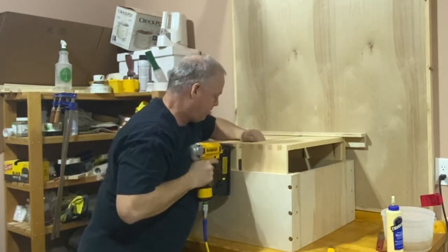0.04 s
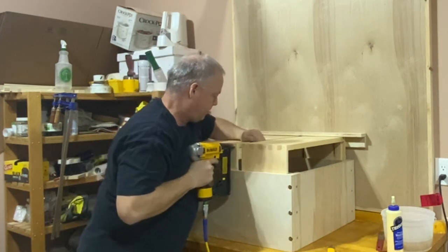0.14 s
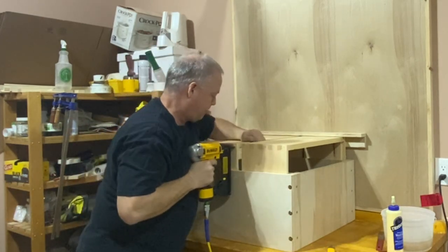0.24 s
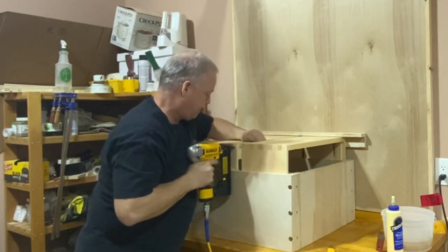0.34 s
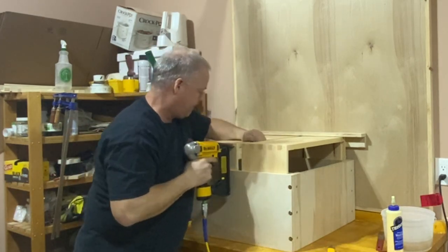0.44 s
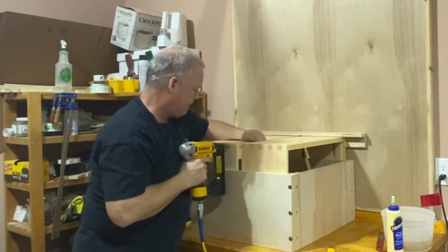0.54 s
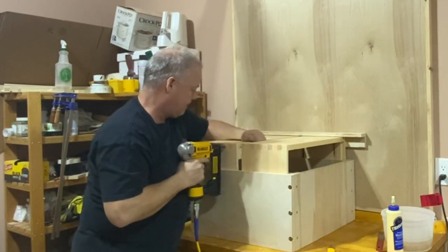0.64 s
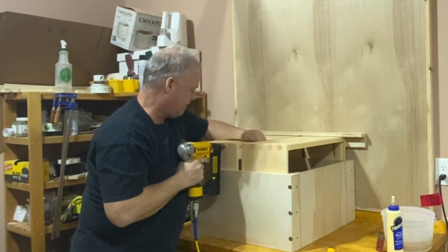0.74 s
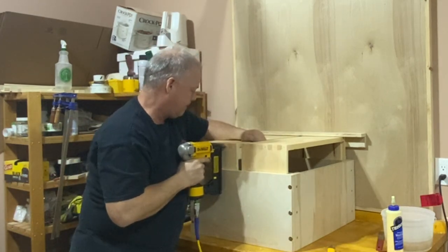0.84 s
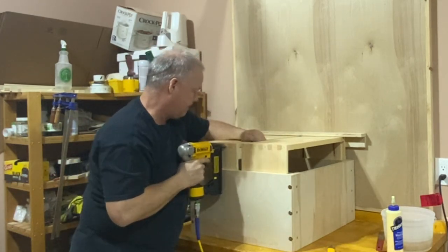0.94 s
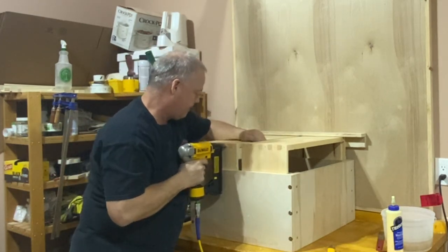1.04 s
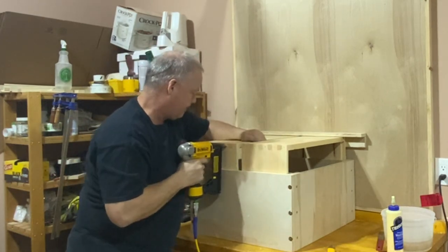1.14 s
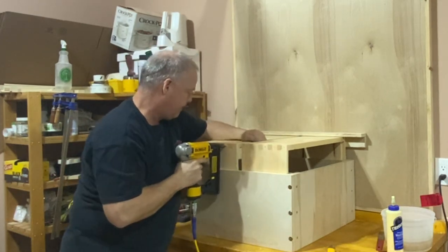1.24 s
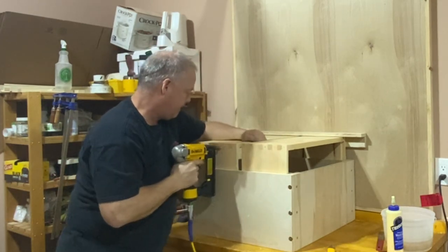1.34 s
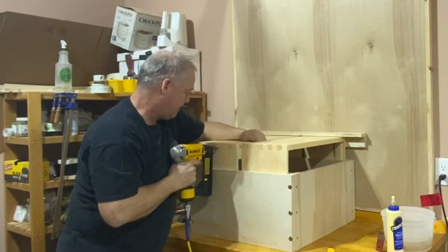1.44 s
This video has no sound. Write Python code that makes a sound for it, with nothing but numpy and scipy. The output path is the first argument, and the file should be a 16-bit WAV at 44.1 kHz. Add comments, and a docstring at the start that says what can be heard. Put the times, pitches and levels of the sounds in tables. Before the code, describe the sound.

An air stapler fires twice into a hollow plywood box. After a faint thud at the start, a sharp crack and woody rattle hit at 0.21 s, with a metallic return clack and air puff at 0.31. Hiss fades; faint nose clicks and scuffing come at 0.72-0.86, soft bumps near 0.95. The second shot hits at 1.04, its return at 1.14, then a drag on wood at 1.38-1.5. Short room tail, low steady hum.

```python
"""A faint thud, then an air stapler fires twice into a plywood box in a small workshop. Each shot: valve crack
(shaped noise), rattling driver blow into the box (noise, grains and ringing modes), leaking air, the piston's
ringing return with an exhaust puff, knocks (ringing sines). Between the shots the nose clicks, bumps and drags on
the wood; after the second it drags again. Room tails and steady background noise surround it.
One microphone is widened to stereo by a phase-turning filter and a share that differs between the channels."""
import sys
import numpy as np
from scipy import signal
from scipy.fft import rfft, irfft, next_fast_len
from scipy.io import wavfile

SR = 44100
rng = np.random.default_rng(int(sys.argv[2]) if len(sys.argv) > 2 else 0)


def ratio_of_db(decibels):
    """Turn decibels (scalar or array-like) into linear amplitude factors; 0 dB maps to 1."""
    return 10 ** (np.asarray(decibels, float) / 20)


def transcribe(u):
    """Save the signal u as a 16-bit wav file named by the first command-line argument.

    u: samples, shape (n,) or (channels, n), limited to [-1, 1]; the rate is SR.
    q: integer samples, one column per channel.
    """
    v = np.clip(np.atleast_2d(u).T, -1, 1)
    q = np.round(v * 32767).astype(np.int16)
    wavfile.write(sys.argv[1], SR, q)


N = 66150
T = np.arange(N) / SR
M = next_fast_len(2 * N)
HZ = np.maximum(np.arange(M // 2 + 1) * SR / M, 1)

# shots: start_s, crack_db, blow_db, blow_delay_s
SHOTS = [(0.2095, -14.5, -11.5, 0.005), (1.038, -12.5, -14, 0.00664)]
# piston returns, one for each shot: start_s, ring_db, exhaust_db, leak_db
RETURNS = [(0.3141, -1, -19, -26), (1.1384, -0.5, -17, -19.5)]
# spectral density of escaping air: frequency_hz, level_db
AIR_SPECTRUM = [(200, -7.5), (500, -3.5), (1000, -8.5), (1600, 1), (2250, 2.5), (2550, -2), (4500, -11),
                (6000, -4), (10000, -3.5), (12000, -4), (15600, -14), (16300, -40)]
AIR_RELEASE_T60_S = 0.19


def at_hz(points, hz=HZ):
    """Spectral interpolation: a level curve is linear over log frequency."""
    freq_hz, level = np.array(points)[:, 0], np.array(points)[:, 1]
    return np.interp(np.log(hz), np.log(freq_hz), level)


def colour(x, spectrum):
    """Minimum-phase filtering by a folded cepstrum: causal, with unit power gain on white noise."""
    cepstrum = irfft(np.log(ratio_of_db(at_hz(spectrum))), M)
    cepstrum[1:M // 2] *= 2
    response = np.exp(rfft(cepstrum[:M // 2 + 1], M))
    power_gain = np.mean(abs(response) ** 2)
    return irfft(rfft(x, M) * response / np.sqrt(power_gain), M)[:N]


def shape(start, rise, hold, t60):
    """Energy decay: linear rise, hold, then exponential release of 60 dB in t60 (all in s)."""
    t = T - start
    return np.clip(t / rise, 0, 1) * ratio_of_db(-60 * np.clip(t - rise - hold, 0, 3) / t60)


def ring(x, hz, t60):
    """Damped resonator: a unit click sets a decaying sine of initial height 1 ringing."""
    radius, angle = ratio_of_db(-60 / (t60 * SR)), 2 * np.pi * hz / SR
    return signal.lfilter([0, np.sin(angle)], [1, -2 * radius * np.cos(angle), radius * radius], x + 1e-18)


def soft(x, cut_hz):
    """Contact softness: a double one-pole low-pass blunts an impulse."""
    pole = np.exp(-2 * np.pi * cut_hz / SR)
    return signal.lfilter([(1 - pole) ** 2], [1, -2 * pole, pole * pole], x)


def peak_one(x):
    """Peak normalisation: scale to a largest magnitude of 1."""
    return x / np.max(abs(x))


def click(start):
    """Unit impulse: one sample of 1, which excites all frequencies alike."""
    return 1. * (np.arange(N) == int(start * SR))


def grains(rate, spread_db):
    """Shot noise: random clicks (rate per s) of uneven size and either sign, rms 1."""
    happens = rng.random(N) < rate / SR
    size = ratio_of_db(spread_db * np.minimum(rng.exponential(1, N), 3))
    train = happens * size * rng.choice([-1, 1], N)
    return train / np.sqrt(np.mean(train ** 2) + 1e-20)


def sputter():
    """Turbulence: smooth noise with a share of its power in crackling grains."""
    crackle_share = 0.34
    smooth = np.sqrt(1 - crackle_share) * rng.standard_normal(N)
    return smooth + np.sqrt(crackle_share) * grains(2000, spread_db=4.)


def box(force):
    """Modal superposition: a force sets each mode of the plywood box ringing."""
    # box modes: pitch_hz, level_db, t60_s
    modes = [(140, -14, 0.017), (180, -1.5, 0.042), (213, -3, 0.036), (295, -6, 0.034), (347.2, 2.5, 0.14),
             (481.7, 3, 0.07), (650, -7, 0.017), (754, -1, 0.04), (1060, -8.5, 0.02), (1380, 2, 0.11),
             (1410, -3.5, 0.06), (2400, -2.5, 0.043)]
    return sum(ratio_of_db(db) * ring(force, hz, t60) for hz, db, t60 in modes)


def background():
    """Stationary noise: two independent channels with the same coloured spectrum."""
    # spectral density of the background: frequency_hz, level_db
    floor_spectrum = [(24, -30.5), (45, 12), (90, -5.5), (148, -4.5), (252, -18), (314, -14), (872, -26.5),
                      (2120, -29), (4000, -39.5), (8000, -46), (10400, -56), (17600, -100)]
    level_db = -57
    return ratio_of_db(level_db) * np.array([colour(rng.standard_normal(N), floor_spectrum) for _ in range(2)])


def knocks():
    """Impact excitation: cascaded resonators give swelling thuds; noise gives the brighter box rattle."""
    # dull thuds of tool, box and bench: start_s, level_db, pitch_hz, t60_s, rattle_db
    thud_events = [(.001, -42, 94.2, 0.57, -46), (0.254, -26.5, 96.3, .15, -56.5),
                   (.318, -31, 241.3, 0.12, -60), (0.369, -22.5, 283.1, 0.032, -36),
                   (.740, -51, 196.6, 0.12, -76), (0.806, -51.5, 197, 0.22, -67),
                   (0.9322, -65, 406, 0.038, -59), (0.94, -57, 408, .03, -68.5),
                   (.9535, -33, 186, 0.026, -93), (0.968, -42, 174.7, .05, -73.5),
                   (0.978, -43.5, 133, .14, -82), (1.085, -17, 98.2, 0.062, -27.5),
                   (1.144, -18, 249.7, 0.028, -41.5), (0.359, -34, 84.8, 0.16, -61.5),
                   (1.189, -23.5, 254.4, 0.1, -36.5)]
    # spectral density of the box rattle: frequency_hz, level_db
    rattle_spectrum = [(150, -5.5), (400, 6), (800, 1), (1400, -0.5), (2000, -6.5), (3500, -20),
                       (7000, -30), (12000, -33.5)]
    swell_t60_s, rattle_t60_s = 0.017, 0.21
    thuds, rattle = 0, 0
    for s, db, hz, t60, rattle_db in thud_events:
        thuds = thuds + ratio_of_db(db) * peak_one(ring(ring(click(s), hz, swell_t60_s), hz, t60))
        rattle = rattle + ratio_of_db(rattle_db) * shape(s, 0.00073, 0.016, rattle_t60_s)
    return thuds + colour(rattle * sputter(), rattle_spectrum)


def valve_crack():
    """Sudden gas release: each opening valve gives a short burst of coloured noise."""
    # spectral density of the crack: frequency_hz, level_db
    crack_spectrum = [(100, -26.5), (400, 7.5), (1500, 1.5), (3000, -12), (6000, -1), (9000, 3),
                      (13000, -10.5), (16000, -22)]
    rise_s, hold_s, t60_s = .0006, 0.0035, .016
    envelope = sum(ratio_of_db(crack_db) * shape(s, rise_s, hold_s, t60_s) for s, crack_db, *_ in SHOTS)
    return colour(envelope * rng.standard_normal(N), crack_spectrum)


def leak():
    """Turbulent leakage: air hisses from the shot until the piston returns, then fades."""
    # tilt that makes the leak brighter than the exhaust: frequency_hz, level_db
    leak_tilt = [(1000, -14), (5000, 1.5), (11000, -6), (15500, 3.5)]
    rise_s = 0.0032
    flow = 0
    for (shot_s, *_), (return_s, _, _, leak_db) in zip(SHOTS, RETURNS):
        hold_s = return_s - shot_s - rise_s
        flow = flow + ratio_of_db(leak_db) * shape(shot_s, rise_s, hold_s, AIR_RELEASE_T60_S)
    return colour(colour(flow * rng.standard_normal(N), leak_tilt), AIR_SPECTRUM)


def nose_kick():
    """Impulse response of the box: the nose kicks its modes just after each crack."""
    lag_s, kick_db = .0015, -11.5  # level relative to the crack
    kicks = sum(ratio_of_db(crack_db + kick_db) * click(s + lag_s) for s, crack_db, *_ in SHOTS)
    return box(soft(kicks, cut_hz=1400))


def driver_blow():
    """Repeated impact: the driver bounces four times, tapping the box's modes, and the box shudders."""
    # driver bounces within each blow: lag_s, level_db (relative to the blow)
    bounces = [(0., -2), (.004, -2.5), (.008, 0), (0.013, 3.5)]
    # spectral density of the blow: frequency_hz, level_db
    blow_spectrum = [(60, -30.5), (150, -7.5), (330, -0.5), (500, 2.5), (900, -8), (1400, -2.5), (2250, 3),
                     (2650, -5.5), (5800, -10), (8000, -8.5), (12500, -16), (16000, -21.5), (17000, -51.5)]
    bounce_t60_s, shudder_t60_s = 0.029, 0.2
    shudder_db, tap_db = -7.5, -12.5  # relative to the blow and to each bounce
    force, taps = 0, 0
    for s, _, blow_db, delay_s in SHOTS:
        start_s = s + delay_s
        force = force + ratio_of_db(blow_db + shudder_db) * shape(start_s, 0.0052, 0.053, shudder_t60_s)
        for lag_s, db in bounces:
            force = force + ratio_of_db(blow_db + db) * shape(start_s + lag_s, 0.0028, 0.0012, bounce_t60_s)
            taps = taps + ratio_of_db(blow_db + db + tap_db) * click(start_s + lag_s)
    hits = force * grains(1400, spread_db=4.5)
    hiss = force * rng.standard_normal(N)
    rattle = colour(.5 * hits + 0.44 * hiss, blow_spectrum)
    return box(soft(taps, cut_hz=1400)) + rattle + ratio_of_db(-41.5) * box(hits)


def piston_return():
    """Impulsive resonance: each piston stop strikes a short metallic ring (second result) and the box (first)."""
    # upper notes of the return ring: pitch_hz, level_db (relative to the lowest note)
    upper_notes = [(3550, -17), (5100, -15)]
    swell_t60_s, ring_t60_s = 0.0034, 0.0028
    stops = sum(ratio_of_db(ring_db) * click(s) for s, ring_db, *_ in RETURNS)
    ping = 0
    for hz, db in [(2000, 0)] + upper_notes:
        swell = ring(ring(stops, hz, swell_t60_s), hz, swell_t60_s)
        ping = ping + ratio_of_db(db) * peak_one(ring(swell, hz, ring_t60_s))
    return ratio_of_db(-31) * box(stops), max(stops) * ping


def exhaust():
    """Turbulent jet: air puffs out at each return, then bleeds on until the valve seals."""
    rise_s, hold_s = 0.012, 0.014
    bleed_db, bleed_t60_s = -15.5, 0.62  # level relative to the puff
    bleed_s, seal_t60_s = .21, 0.15
    flow = 0
    for s, _, puff_db, _ in RETURNS:
        puff = shape(s, rise_s, hold_s, AIR_RELEASE_T60_S)
        bleed = shape(s, rise_s, 0, bleed_t60_s) * shape(s, rise_s, bleed_s, seal_t60_s)
        flow = flow + ratio_of_db(puff_db) * puff + ratio_of_db(puff_db + bleed_db) * bleed
    return colour(flow * sputter(), AIR_SPECTRUM)


def nose_clicks():
    """Noise-driven resonance: each click of the nose safety is a pitched ring plus broadband noise."""
    # clicks of the nose safety: start_s, burst_db (before the mix of ring and noise), pitch_hz
    nose_events = [(0.7239, -47, 7600), (0.776, -50.5, 6820), (0.778, -57.5, 5450)]
    burst_t60_s, ring_t60_s, wide_db = 0.3, 0.0029, -12.5
    out = 0
    for s, db, hz in nose_events:
        burst = ratio_of_db(db) * shape(s, 0.00065, 0.0041, burst_t60_s) * rng.standard_normal(N)
        out = out + 0.15 * ring(burst, hz, ring_t60_s) + ratio_of_db(wide_db) * colour(burst, AIR_SPECTRUM)
    return out


def nose_drags():
    """Friction: the nose dragging on wood gives sputtering noise and a wavering hum of the panel."""
    # drags: start_s, end_s, scuff_db (before the scuff gain), hum_db
    strokes = [(0.73, 0.859, -69.5, -74), (1.375, 1.495, -51.5, -49)]
    # spectral density of the scuff: frequency_hz, level_db
    scuff_spectrum = [(190, -0.5), (320, 4.5), (600, -11.5), (1500, -5.5), (3000, -11), (7000, -19),
                      (12000, -20), (16000, -28)]
    scuff_gain_db, hum_hz = 1.5, 322
    waver = .03  # rms random phase step, radians per sample
    scuff, hum = 0, 0
    for start_s, end_s, scuff_db, hum_db in strokes:
        arc = np.sin(np.pi * np.clip((T - start_s) / (end_s - start_s), 0, 1))
        scuff = scuff + ratio_of_db(scuff_db) * arc
        hum = hum + ratio_of_db(hum_db) * arc
    phase = np.cumsum(2 * np.pi * hum_hz / SR + waver * rng.standard_normal(N))
    return hum * np.sin(phase) + ratio_of_db(scuff_gain_db) * colour(scuff * sputter(), scuff_spectrum)


def room(x):
    """Diffuse reverberation: convolution with two noise tails whose octave bands die at their own rates."""
    # reverberation time: frequency_hz, t60_s
    decay_times = [(90, 1), (250, .55), (700, 0.52), (2000, 0.43), (5000, 0.41), (9000, 0.3), (14000, 0.39)]
    # band gains of the tail: frequency_hz, level_db
    tail_tilt = [(100, 2), (300, 2.5), (1000, 5.5), (8000, 3)]
    level_db, gap_s, rise_s = -11.5, 0.0017, 0.015
    white = rng.standard_normal((2, N))
    tail = 0
    for low_hz in 45 * 2. ** np.arange(0, 9):
        band_hz = [low_hz, min(2 * low_hz, .45 * SR)]
        band = signal.sosfilt(signal.butter(2, band_hz, "band", fs=SR, output="sos"), white)
        decay = shape(gap_s, rise_s, 0, at_hz(decay_times, 1.67 * low_hz))
        tail = tail + ratio_of_db(at_hz(tail_tilt, 1.2 * low_hz)) * band * decay
    tail = tail / np.sqrt(np.sum(tail ** 2, axis=1, keepdims=True))  # unit energy
    return ratio_of_db(level_db) * irfft(rfft(x, M) * rfft(tail, M), M)[:, :N]


def scene():
    """Superposition: row 0 is what both channels share, row 1 the later, diffuse part that differs."""
    second_path_s = 0.0014
    ring_room_share = .22  # of the return ring's amplitude
    box_stop, ping = piston_return()
    shots = valve_crack() + nose_kick() + driver_blow()
    rest = knocks() + shots + leak() + box_stop + exhaust() + nose_clicks() + nose_drags()
    direct = rest + ping
    second_path = 0.39 * np.pad(direct, (int(second_path_s * SR), 0))[:N]
    return room(rest + ring_room_share * ping) + [direct, second_path] + background()


def top_cut(x):
    """Nothing passes above the cut-off."""
    return signal.sosfilt(signal.butter(12, 16810, fs=SR, output="sos"), x)


def record(dry):
    """Interchannel phase and level differences widen the microphone signal; peaks are clipped."""
    # phase by which left leads: frequency_hz, phase_rad
    phase_turn = [(0, 0), (250, 0), (700, .9), (1210, .3), (1720, -.6), (2400, -3.1), (3400, -5.7),
                  (4500, -6.7), (6500, -7.5), (7600, -8.2), (8600, -8.9), (9200, -3 * np.pi),
                  (11100, -3 * np.pi), (11700, -10.4), (12700, -11.6), (13200, -4 * np.pi),
                  (22050, -4 * np.pi)]
    # left minus right: frequency_hz, level_db
    level_lean = [(200, -0.5), (480, 4), (950, 1.5), (2200, 3), (3800, 2), (5500, -3), (8800, 3),
                  (16000, 1.5)]
    # gain of the share that differs between the channels: frequency_hz, level_db
    unlike_share = [(70, -21), (170, -15.5), (300, -4), (450, -3.5), (750, 3), (1200, -2), (2300, 1),
                    (4000, -1), (7000, -5), (8700, -7.5), (9300, -26), (11000, -3), (11700, -6),
                    (12900, -14.5), (13300, -40)]
    s = 1j * HZ / 83  # frequency relative to the microphone's 83 Hz low cut
    low_cut = (s ** 2 / (1 + 1.4 * s + s ** 2)) ** 2
    same, other = rfft(dry, M)
    same = same * low_cut
    other = 1j * other * low_cut * ratio_of_db(at_hz(unlike_share))  # 1j: a quarter turn
    turn = np.exp(1j * np.interp(HZ, *np.transpose(phase_turn)))
    lean = ratio_of_db(at_hz(level_lean) / 2)
    left, right = (same + other) * turn * lean, (same - other) / lean
    stereo = irfft([left, right], M)[:, :N]
    return top_cut(np.clip(stereo, -1, 1))


dry = scene()
out = record(dry)
transcribe(out)
```